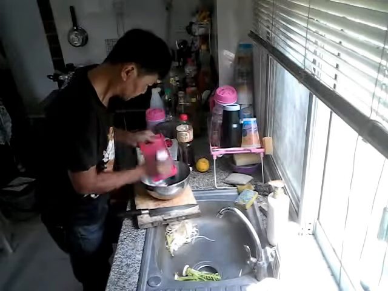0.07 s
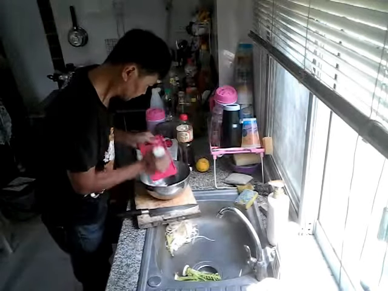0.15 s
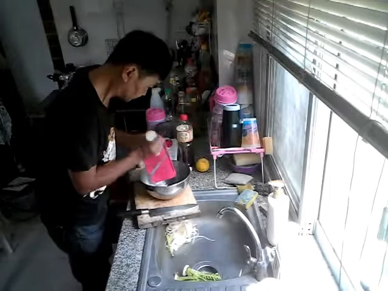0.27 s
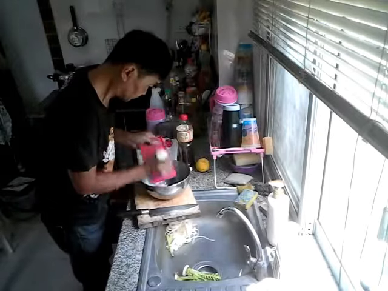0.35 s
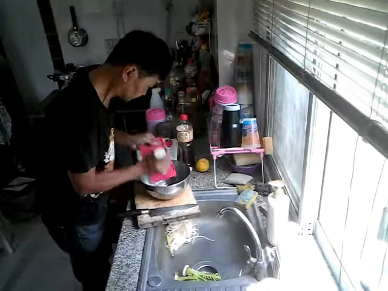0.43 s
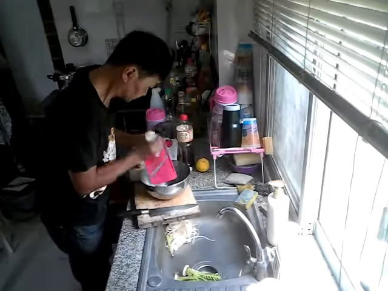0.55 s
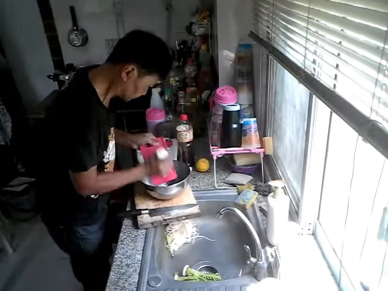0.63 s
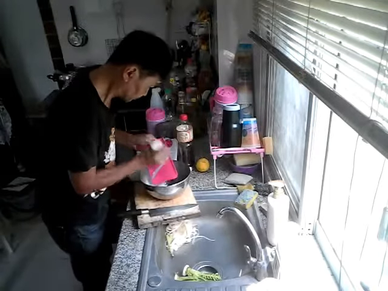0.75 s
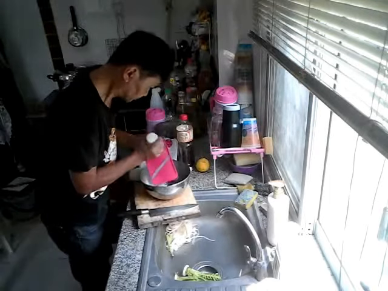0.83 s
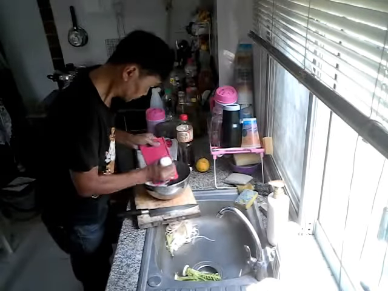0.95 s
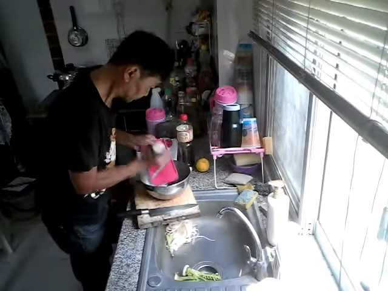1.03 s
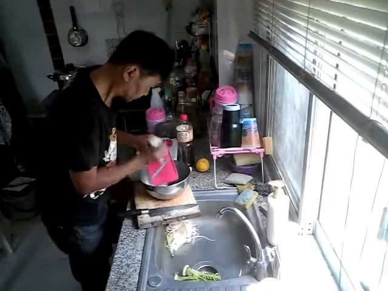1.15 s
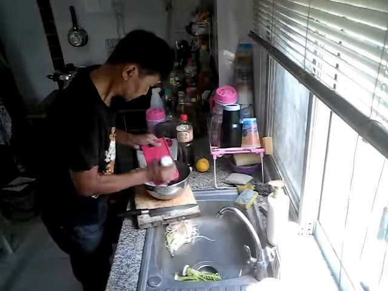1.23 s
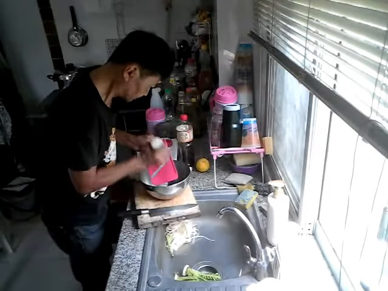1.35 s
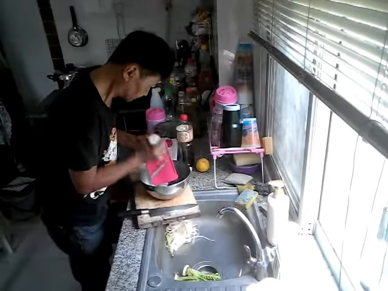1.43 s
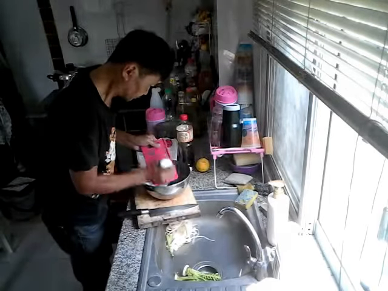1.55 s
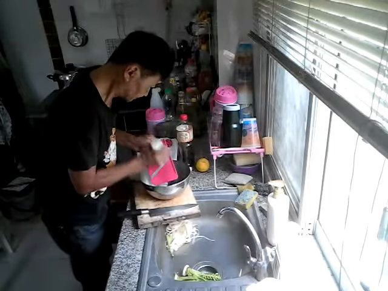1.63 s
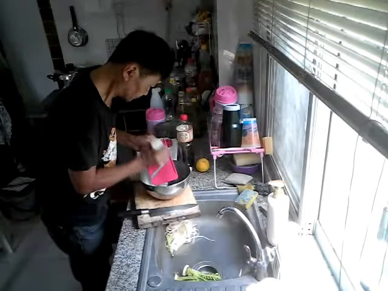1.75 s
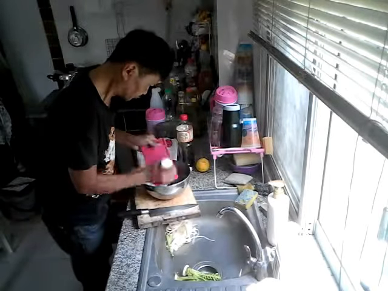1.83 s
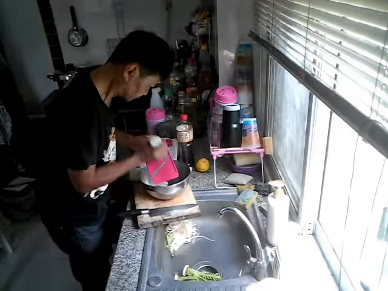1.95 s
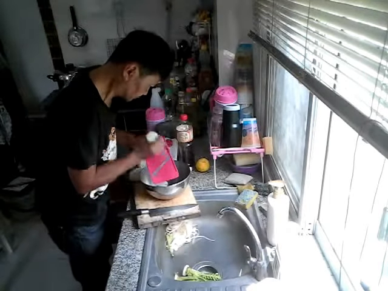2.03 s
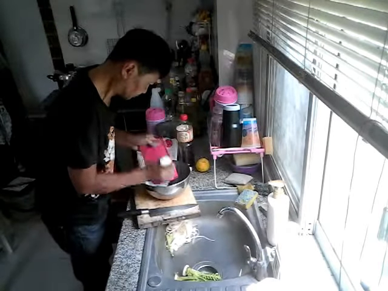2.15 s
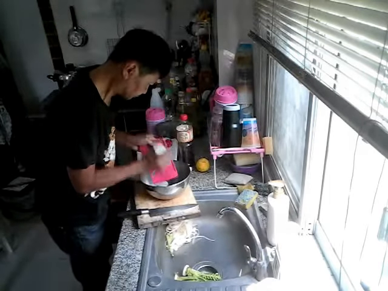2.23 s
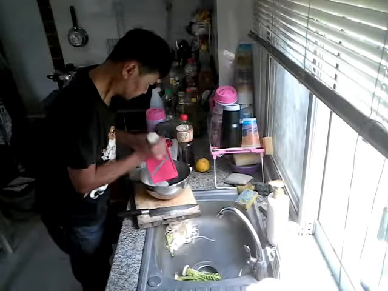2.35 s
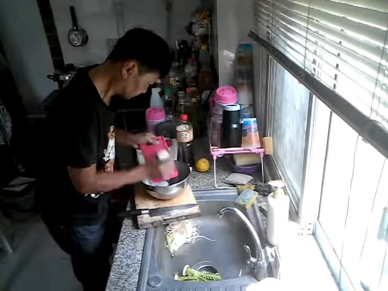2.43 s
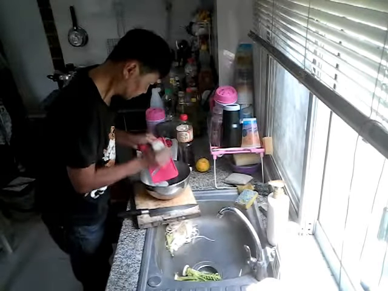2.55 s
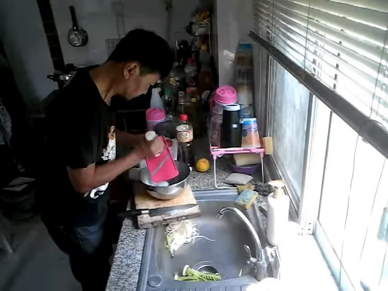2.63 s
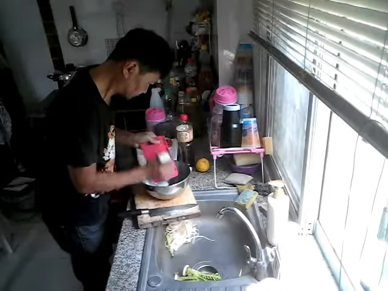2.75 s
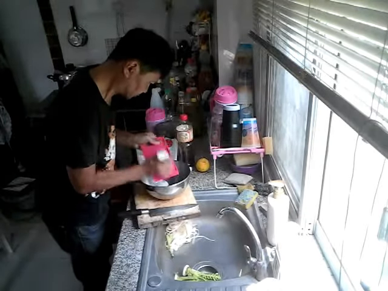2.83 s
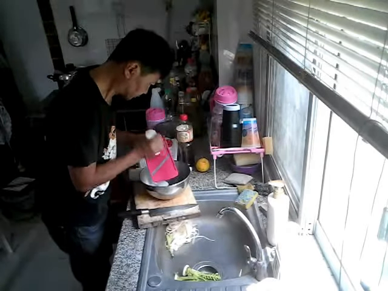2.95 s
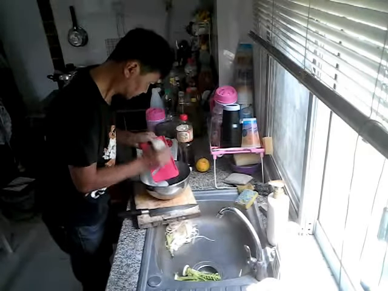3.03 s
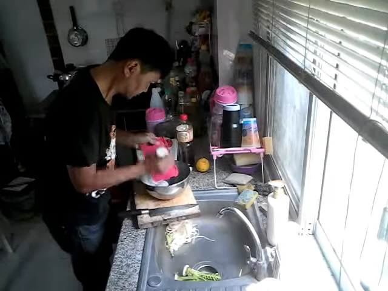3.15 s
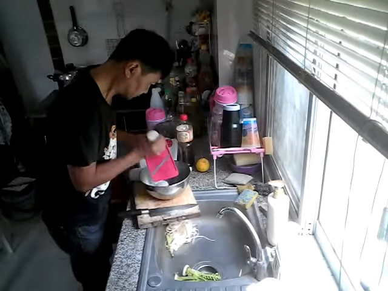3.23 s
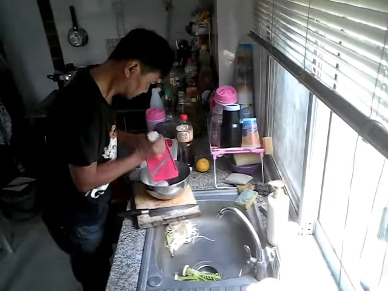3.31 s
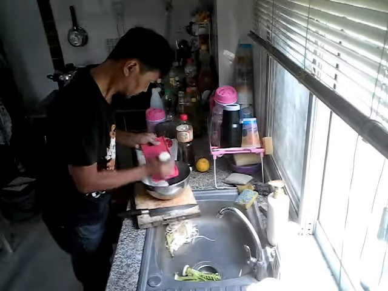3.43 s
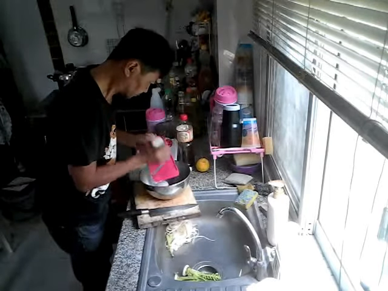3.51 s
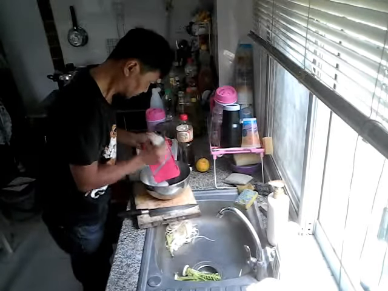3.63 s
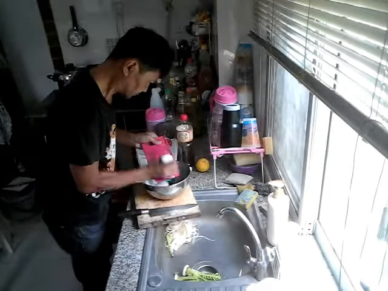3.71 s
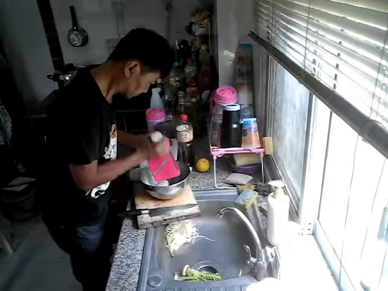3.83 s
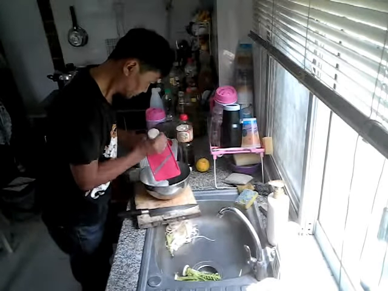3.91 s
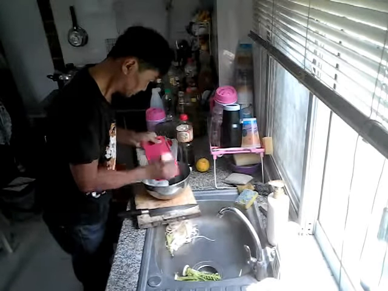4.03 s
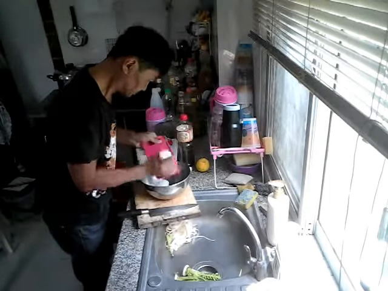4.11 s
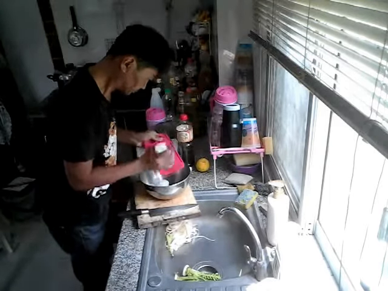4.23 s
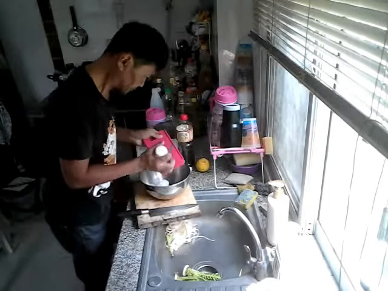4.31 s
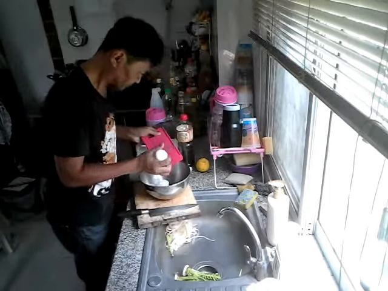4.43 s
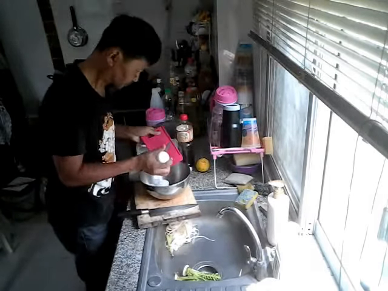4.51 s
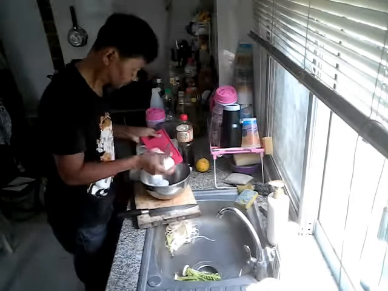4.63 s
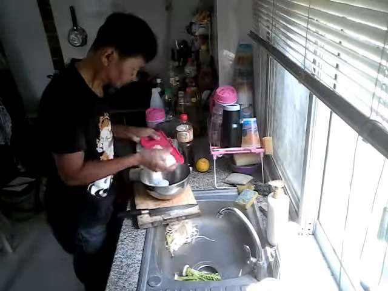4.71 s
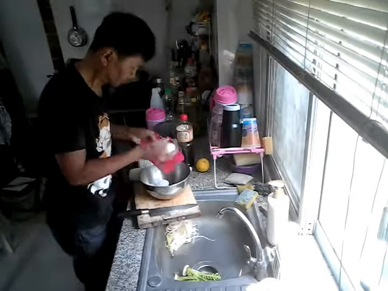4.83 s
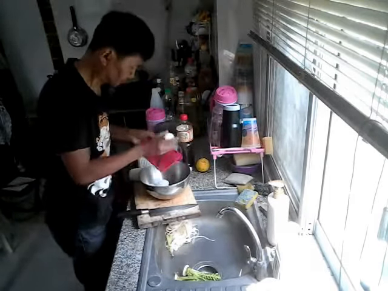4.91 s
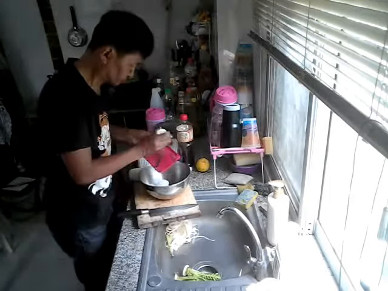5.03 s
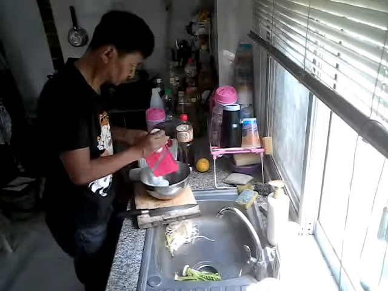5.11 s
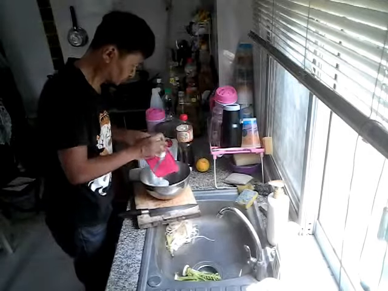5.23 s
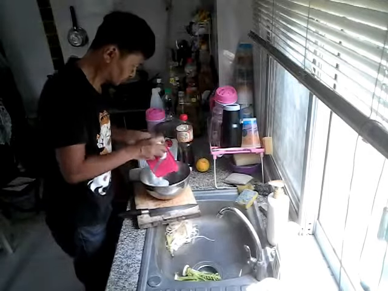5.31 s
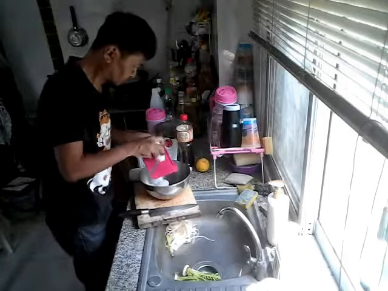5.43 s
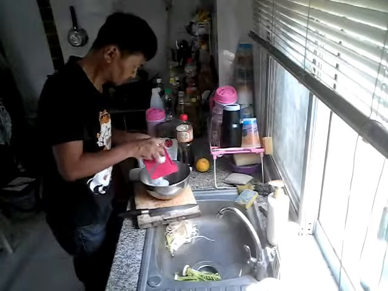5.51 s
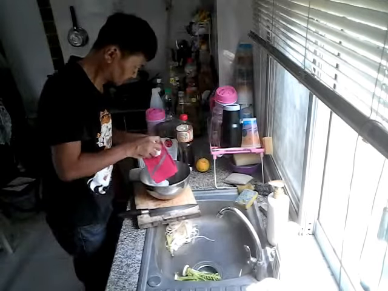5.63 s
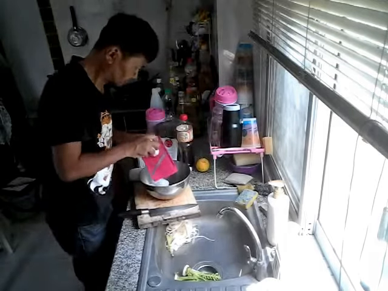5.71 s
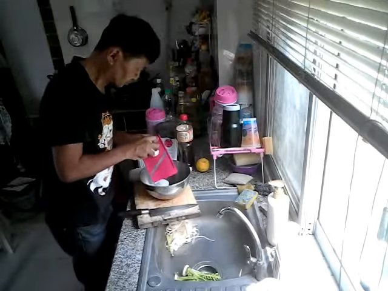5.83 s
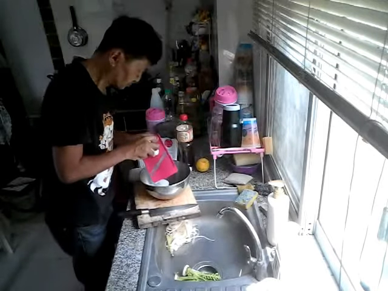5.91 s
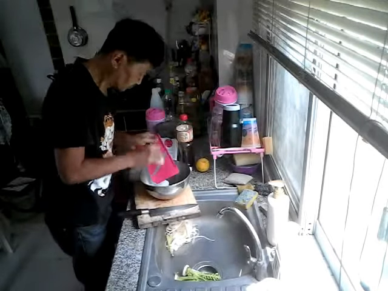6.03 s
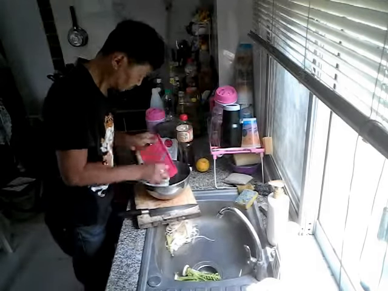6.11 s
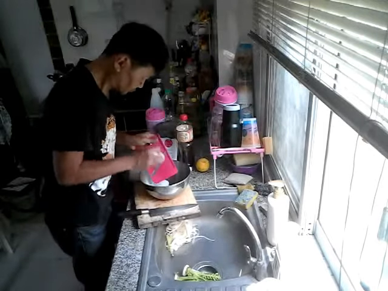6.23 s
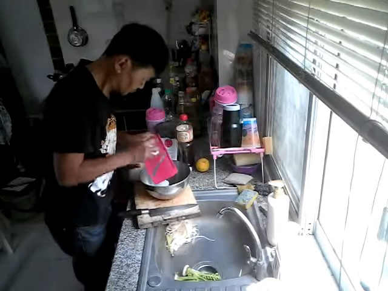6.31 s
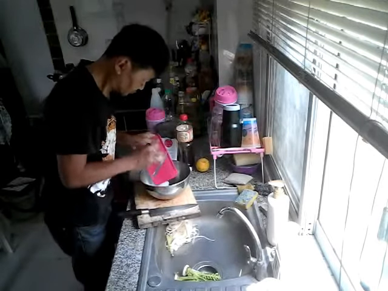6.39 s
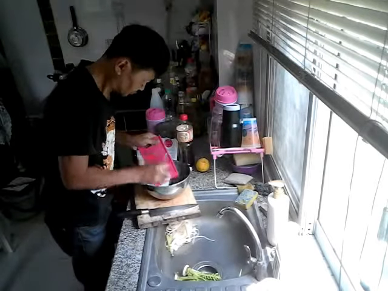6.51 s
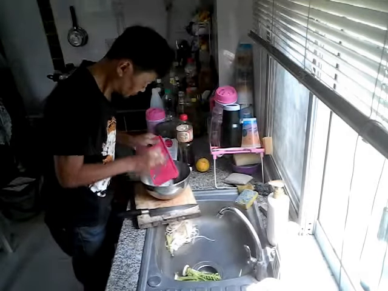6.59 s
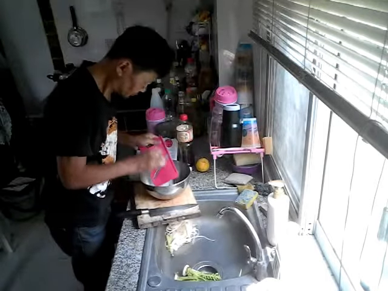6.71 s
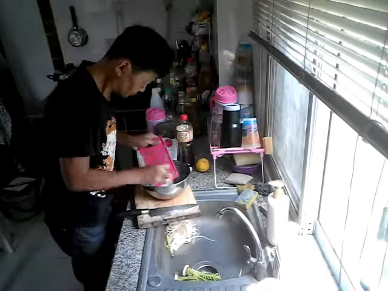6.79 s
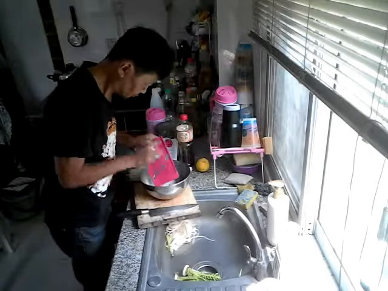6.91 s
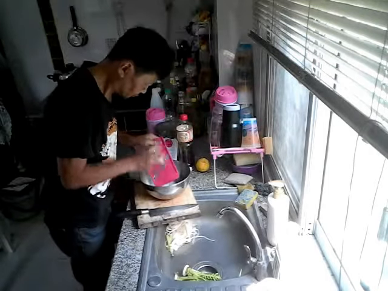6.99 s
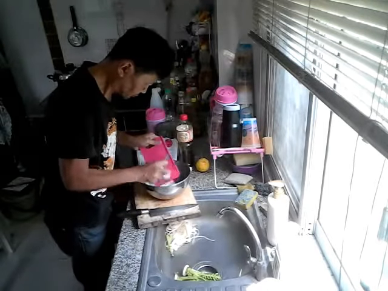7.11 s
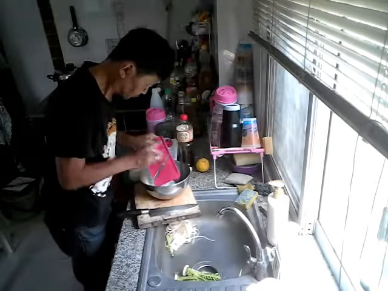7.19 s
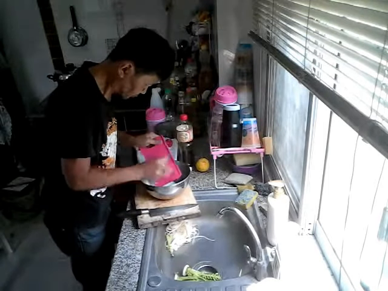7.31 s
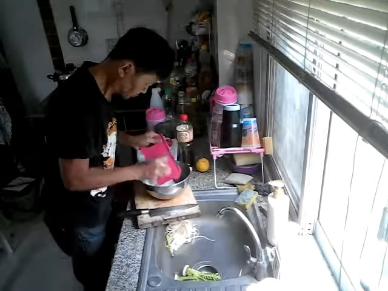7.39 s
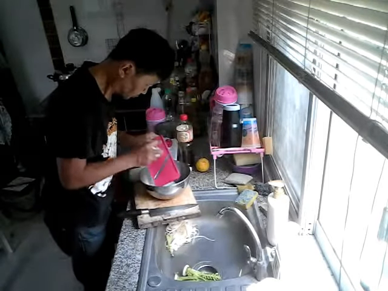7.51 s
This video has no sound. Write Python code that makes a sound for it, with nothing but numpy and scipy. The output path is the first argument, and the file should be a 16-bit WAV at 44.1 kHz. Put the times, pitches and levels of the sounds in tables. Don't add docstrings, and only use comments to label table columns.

```python
import sys
import numpy as np
from scipy import signal
from scipy.fft import rfft, irfft
from scipy.io import wavfile

SR = 44100
rng = np.random.default_rng(int(sys.argv[2]) if len(sys.argv) > 2 else 0)


def master_out(mix):
    frames = np.transpose(np.atleast_2d(mix))
    ceiling = np.clip(frames, -1, 1)
    pcm = np.round(ceiling * 32767).astype(np.int16)
    wavfile.write(sys.argv[1], SR, pcm)


def undo_db(level):
    steps = np.asarray(level, float) / 20
    return 10 ** steps


N = 332955

# t/s, bite peak level/dB, load as ramp rumble level/dB, ramp hum f/Hz
CUTS = [(0.129, -27.5, -43, 667), (0.409, -31, -43, 630), (0.7, -42, -44, 1070), (0.981, -24, -41, 626),
        (1.273, -32, -42, 1040), (1.563, -39, -42.5, 680), (1.854, -20.5, -41.5, 785),
        (2.18, -44, -45, 940), (2.483, -31, -43, 607), (2.799, -31, -44, 786), (3.122, -35, -45, 765),
        (3.441, -27, -44.5, 620), (3.74, -30, -43.5, 830), (4.07, -23, -42.5, 700),
        (6.124, -28, -56.5, 760), (6.501, -14.5, -45.5, 785), (6.811, -20, -45, 774),
        (7.105, -30, -44, 1030), (7.384, -15.5, -44, 1030)]
# t/s, peak level/dB, bowl ring level/dB, hardness level/dB
KNOCKS = [(0.163, -33, 8.5, 13), (0.446, -26.5, 9, 10), (0.736, -24.5, 4, 4.5), (1.018, -27.5, 13.5, 13),
          (1.309, -27, 13.5, 13), (1.598, -25.5, 8.5, 7), (1.899, -34.5, 0, 9.5), (2.221, -25.5, -2, 1.5),
          (2.518, -21.5, 2.5, 5.5), (2.836, -30, -21, 9), (3.164, -30, -8, 8), (3.484, -32.5, -23, 9),
          (3.776, -27, 3, 8), (4.106, -24.5, -4, 4), (6.153, -37, 5.5, 7.5), (6.549, -31, 2, 4),
          (6.848, -26, 4.5, 1), (7.146, -24, -7, 0.5), (7.419, -27, -21, -11)]
# t/s, peak level/dB, brightness level/dB, flat face level/dB
THUMPS = [(0.051, -39, 10, -2), (0.337, -45, 6.5, -2), (0.621, -40, 10, -3.5), (0.912, -44.5, 8, -4),
          (1.2, -39, 9.5, -1), (1.483, -42.5, 6.5, -3.5), (1.779, -40, 8.5, -6), (2.09, -45.5, 4.5, -3),
          (2.404, -37.5, 8.5, -4), (2.721, -37, 6.5, -0.5), (3.039, -43.5, 7, 0), (3.357, -37.5, 5.5, -4),
          (3.662, -48, 10.5, 1), (3.993, -40, 8, -1), (5.125, -69, 1, -2), (5.805, -37, 3, -1.5),
          (6.375, -44, 7.5, 0), (6.731, -36, 5, 1.5), (7.017, -38, 4, -0.5), (7.216, -37, 7, -2.5),
          (7.301, -31.5, 6.5, -1)]
# t/s, peak level/dB, share through the high ring/0-1
TICKS = [
    (2.094, -65, 0.4),
    (2.114, -56, 0.07),
    (3.3, -52, 0.57),
    (4.415, -68.5, 0),
    (5.532, -45, 0.17),
    (5.55, -52, 0.3),
    (6.33, -61.5, 0.3),
]
# f/Hz, level/dB
FIBRE_COLOUR = [(1180, -4.5), (2000, -2), (2810, -1.5), (3280, -10), (3550, -17), (3970, -9.5), (4730, -1),
                (6470, -3.5), (7690, 3), (9730, -9.5), (13100, 0), (14900, -6.5), (16000, -2)]
# f/Hz, level/dB
DRAG_COLOUR = [(120, -53.5), (200, -6), (391, -9), (595, -0.5), (738, -1), (1110, -4.5), (1510, -15.5),
               (1860, -9.5), (2820, -30), (3500, -20.5), (4550, -52), (7700, -120)]
# f/Hz, level/dB
KNOCK_COLOUR = [(47, -38), (80, -11), (253, -0.5), (628, 3), (1190, -1.5), (1400, -9), (2170, -16),
                (3780, -30.5), (6580, -31.5), (7520, -35.5), (9810, -35), (14900, -34.5), (16000, -48)]
# f/Hz, level/dB
THUMP_COLOUR = [(29, -54), (50, -10), (107, -35), (205, -3), (449, 13.5), (635, -1.5), (939, -12),
                (1620, -22), (2390, -39), (7730, -40.5), (9000, -47), (11700, -42), (19800, -120)]
# f/Hz, level/dB
TICK_COLOUR = [(350, -32), (700, -3), (1530, 8.5), (4770, -4), (7400, -2.5), (10300, -19), (14900, -6),
               (16000, -17)]
# f/Hz, level/dB, time to fall 60 dB t/s
BOWL_MODES = [(627, -8, 0.41), (1154, 1, 0.27), (1166, -12, 0.63), (1212, -13, 0.72), (2068, -7.5, 0.24)]
# f/Hz, level/dB, time to fall 60 dB t/s
HOLLOW_MODES = [(191, -2.5, 0.068), (237, 5, 0.04), (392, -11, 0.16), (447, -7, 0.062), (560, -6, 0.021),
                (670, -10, 0.051), (950, -10, 0.014)]
# f/Hz, level/dB, time to fall 60 dB t/s
SLICER_MODES = [(124.4, -17, 0.3), (226.7, -14, 0.097), (422, -4, 0.094), (468.3, -3, 0.099),
                (607, -0.5, 0.045), (826, -5, 0.053), (959, 0, 0.043), (1104, -0.5, 0.036),
                (1456, -10.5, 0.024), (1664, -6.5, 0.036), (1925, -10.5, 0.013), (2114, -10.5, 0.038)]
# f/Hz, time to fall 60 dB t/s
ROOM_T60 = [(100, 0.43), (300, 0.35), (1000, 0.33), (3000, 0.62), (8000, 0.35), (14000, 0.66)]
# t/s, level/dB
ECHOES = [
    (.0052, -13.5),
    (0.0114, -17),
]
# f/Hz, level/dB
AIR_COLOUR = [(20, -11), (45, -22.5), (75, 0), (160, -7.5), (300, -8.5), (500, -9.5), (1700, -18.5),
              (3000, -22.5), (4200, -30), (5600, -35.5), (8800, -43.5), (11000, -31.5), (13000, -28),
              (16000, -32)]
# f/Hz, width f/Hz, level/dB
HUM = [(77, 19, -98), (198, 14, -79.5), (292.7, 5.2, -74.5), (4780, 130, -88)]
# f/Hz, level/dB
SIDE_COLOUR = [(15, -57), (25, -36), (114, -5), (335, -4.5), (1190, -7.5), (3610, -15.5), (5000, -24.5),
               (12500, -21), (16000, -14)]


def rms_one(x):
    return x / np.sqrt(np.mean(x ** 2) + 1e-20)


def at_hz(points, hz):
    points = np.array(points)
    return np.interp(np.log(hz + 1), np.log(points[:, 0]), points[:, 1])


def colour(x, spectrum):
    size = 4096
    cepstrum = irfft(np.log(undo_db(at_hz(spectrum, np.fft.rfftfreq(size, 1 / SR)))))
    cepstrum[1:size // 2] *= 2
    cepstrum[size // 2:] = 0
    response = irfft(np.exp(rfft(cepstrum)))
    return signal.fftconvolve(x, response / np.sqrt(np.sum(response ** 2)))[:N]


def pass_filter(x, hz, kind):
    return signal.sosfilt(signal.butter(2, hz, kind, fs=SR, output="sos"), x)


def ring(push, hz, t60):
    shrink, turn = undo_db(-60 / (t60 * SR)), 2 * np.pi * hz / SR
    return signal.lfilter([0, np.sin(turn)], [1, -2 * shrink * np.cos(turn), shrink ** 2], push + 1e-18)


def band(hz, width_hz):
    return rms_one(ring(rng.standard_normal(N), hz, np.log(1000) / np.pi / width_hz))


def clicks(times, db):
    out = np.zeros(N)
    out[np.round(np.asarray(times) * SR).astype(int)] = undo_db(db)
    return out


def dying(push, time_s):
    return signal.lfilter([1], [1, -np.exp(-1 / (time_s * SR))], push)


def strike(times, db, modes, scatter_db):
    luck = rng.standard_normal((len(times), len(modes)))
    out = np.zeros(N)
    for k, (hz, mode_db, t60) in enumerate(modes):
        push = clicks(times, db + mode_db + scatter_db * luck[:, k])
        out += (-1) ** k * ring(push, hz, t60)
    return out


def grains(per_s, spread_db):
    sizes = undo_db(spread_db * np.minimum(rng.exponential(1, N), 5)) * rng.choice([-1, 1], N)
    return rms_one(sizes * (rng.random(N) < per_s / SR))


def blows(s, db, bright_db, spectrum, split_hz, burst_s):
    burst = rng.standard_normal(N) * dying(clicks(s, db + bright_db), burst_s)
    low = pass_filter(clicks(s, db), split_hz, "low")
    return colour(low + pass_filter(burst, split_hz, "high"), spectrum)


def background():
    air = undo_db(-67.5) * rms_one(colour(rng.standard_normal(N), AIR_COLOUR))
    whine_hz = 4860 + 18 * band(6.4, 23)
    whine = undo_db(-85.5 + 1.5 * band(3.4, 9)) * np.sin(2 * np.pi * np.cumsum(whine_hz) / SR)
    hum = sum(undo_db(db) * band(hz, width_hz) for hz, width_hz, db in HUM)
    return air + whine + hum


def earlier_stroke(db):
    return undo_db(db) * np.exp(-np.arange(N) / SR / 0.23)


def thumps():
    s, db, bright_db, face_db = np.transpose(THUMPS)
    times = np.append(s, s + 0.00472)
    levels = np.append(db + 12.0, db + face_db + 8)
    contact = blows(times, levels, np.tile(bright_db, 2) - 15.0, THUMP_COLOUR, split_hz=1040, burst_s=0.0079)
    hollow = strike(s + 0.00477, db + face_db - 7.5, HOLLOW_MODES, 1.7)
    board = ring(clicks(s, db - 20.0), 67, 0.13) + ring(clicks(s, db - 19.5), 115, 0.21)
    return contact + hollow + board


def pressure(db, swell_db, lead_s, onset_s, lift_s, linger_db, linger_s):
    t, power = np.arange(N) / SR, np.zeros(N)
    bites_s, parts_s = np.array(CUTS)[:, 0] - lead_s, np.array(KNOCKS)[:, 0]
    for bite, part, level_db in zip(bites_s, parts_s, db):
        span = slice(int(bite * SR), int((part + .6) * SR))
        now = t[span]
        still_to_cut = np.clip((part - now) / (part - bite), 0, 1)
        swell = undo_db(level_db - swell_db * still_to_cut ** 2)
        onset = np.clip((now - bite) / onset_s, 0, 1)
        after = np.maximum(now - part - .006, 0)
        share = undo_db(2 * linger_db)
        release = (1 - share) * np.exp(-2 * after / lift_s) + share * np.exp(-2 * after / linger_s)
        power[span] += (swell * onset) ** 2 * release
    return np.sqrt(power)


def fibres(hiss_db):
    load = pressure(hiss_db, 11.2, 0.00085, 0.00022, 0.03, -9.5, 0.069) + earlier_stroke(-73.5)
    return colour(load * grains(25000, 0.91) * undo_db(1.4 * band(70, 90)), FIBRE_COLOUR)


def steel_edge(hiss_db):
    edge_db = hiss_db - 16.5 + 3.0 * rng.standard_normal(len(hiss_db))
    load = pressure(edge_db, 7.2, .0003, 0.0016, 0.036, -15.5, 0.19)
    return load * undo_db(2.9 * band(25, 30)) * band(7570, 410)


def drag(load_db):
    lumps = undo_db(1.65 * band(36.5, 50))
    load = pressure(load_db, 6.8, 0.0036, 0.0013, 0.02, -20.0, 0.17) * lumps + earlier_stroke(-63)
    shaking = load * grains(5000, 4.4)
    scrape = pass_filter(colour(shaking, DRAG_COLOUR), 420, "high")
    bowl = sum(undo_db(db) * ring(shaking, hz, t60) for hz, db, t60 in BOWL_MODES)
    return scrape + undo_db(-48.5) * bowl


def ramp_hum(starts, load_db, hz):
    push = pressure(load_db, 0.94, 0.0011, 0.0054, 0.015, -30, .03) * grains(1500, 8.6)
    edges = np.append(np.round((starts - .02) * SR).astype(int), N)
    out = np.zeros(N)
    for first, last, pitch_hz in zip(edges, edges[1:], hz):
        out[first:last] = ring(push[first:last], pitch_hz, 0.024)
    return undo_db(-22.0) * out


def blade_song(starts):
    blade_db = -67 + 6 * (starts > 6.7)
    return pressure(blade_db, 11.0, .0003, .004, 0.046, -2.5, 0.061) * band(4200, 270)


def cutting():
    s, _, load_db, hum_hz = np.transpose(CUTS)
    hiss_db = -49 + 0.24 * (load_db + 43.5)
    return fibres(hiss_db) + steel_edge(hiss_db) + drag(load_db) + ramp_hum(s, load_db, hum_hz) + blade_song(s)


def bites():
    s, db = np.transpose(CUTS)[:2]
    return pass_filter(strike(s + 0.0005, db - 27, SLICER_MODES, 6.44), [600, 1500], "band")


def knocks():
    s, db, bowl_db, hard_db = np.transpose(KNOCKS)
    bowl = strike(s, db + bowl_db - 24.0, BOWL_MODES, 0.41)
    _, hz, t60 = BOWL_MODES[1][0], BOWL_MODES[1][0], BOWL_MODES[1][2]
    bowl += ring(clicks([0], -58.5), hz, t60)
    s = np.append(s, s + .0128)
    db = np.append(db, db - 8.5 + 0.48 * hard_db)
    contact = blows(s, db + 4.0, np.tile(hard_db, 2) - 17, KNOCK_COLOUR, split_hz=1590, burst_s=0.014)
    return contact + strike(s, db - 12.5, SLICER_MODES, 3.5), bowl


def ticks():
    s, db, share = np.transpose(TICKS)
    share = np.clip(share, .01, .99)
    crackle = dying(clicks(s, db + 20 * np.log10(1 - share)), 0.0054)
    ringing = ring(clicks(s, db + 20 * np.log10(share)), 7600, 0.044)
    return colour(crackle * grains(20000, 1.6), TICK_COLOUR) + ringing


def squeal():
    t = np.arange(N) / SR
    start_s, end_s = 5.69, 5.778
    line_hz = 13450 - 2500 * (t - start_s) + 25 * band(40, 60)
    line = np.sqrt(2) * np.sin(2 * np.pi * np.cumsum(line_hz) / SR)
    gate = np.clip(np.minimum(t - start_s, end_s - t) / .012, 0, 1)
    air = np.exp(-((t - 5.79) / .12) ** 2) * band(12700, 450)
    return undo_db(-74) * gate * line + undo_db(-76) * air


def kitchen(x, tail_db):
    out = sum(undo_db(db) * np.roll(x, int(s * SR)) for s, db in ECHOES)
    edges = 60 * 2 ** np.arange(0, 8.3, .5)
    white = rng.standard_normal((2, N))
    fill = np.exp(-1 / (0.0016 * SR))
    for k, (low, high) in enumerate(zip(edges, edges[1:])):
        keep = undo_db(-120 / (at_hz(ROOM_T60, np.sqrt(low * high)) * SR))
        energy = pass_filter(x, [low, high], "band") ** 2
        filled = signal.lfilter([1 - fill], [1, -fill], energy)
        stored = signal.lfilter([1 - keep], [1, -keep], filled)
        noise = rms_one(pass_filter(white[k % 2], [low, high], "band"))
        out += undo_db(tail_db) * np.sqrt(np.abs(stored)) * noise
    return out


def scene():
    soft = thumps()
    contact, bowl = knocks()
    hits = contact + bites() + ticks()
    room = kitchen(hits + undo_db(-1.5) * soft, -4.0)
    near = pass_filter(hits + soft + room + bowl + cutting(), 48, "high")
    mid = near + squeal() + background()
    side = undo_db(-79) * rms_one(colour(rng.standard_normal(N), SIDE_COLOUR))
    return np.array([mid + side, mid - side])


def band_limit(x):
    return signal.sosfilt(signal.butter(12, 16120, fs=SR, output="sos"), x)


def record(dry):
    low_pass = signal.ellip(10, .5, 60, 15850, fs=SR, output="sos")
    mix = signal.sosfilt(low_pass, dry) - .0005
    return band_limit(mix)


dry = scene()
out = record(dry)
master_out(out)
```